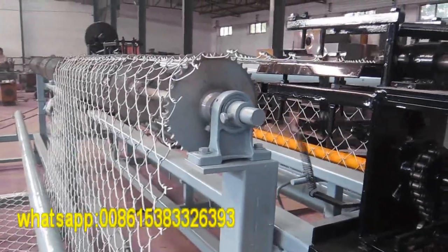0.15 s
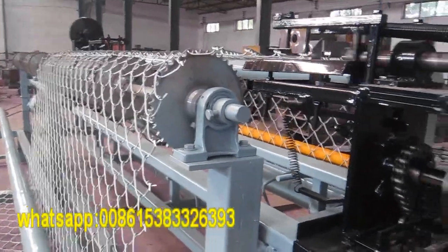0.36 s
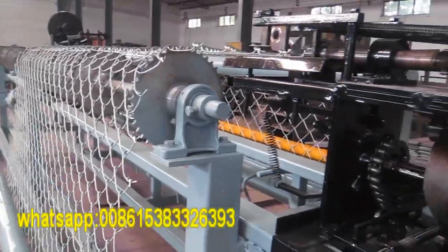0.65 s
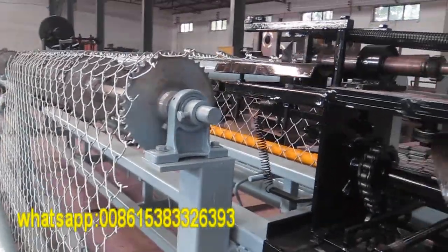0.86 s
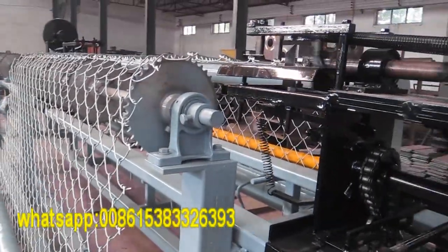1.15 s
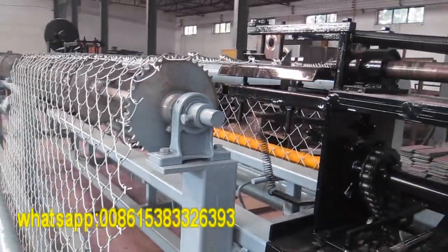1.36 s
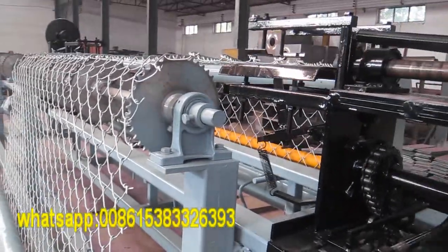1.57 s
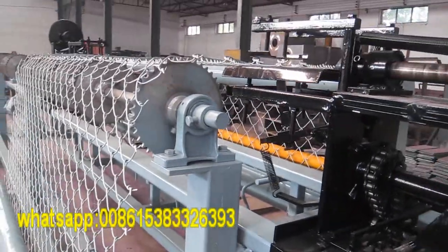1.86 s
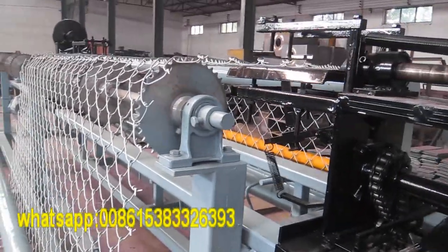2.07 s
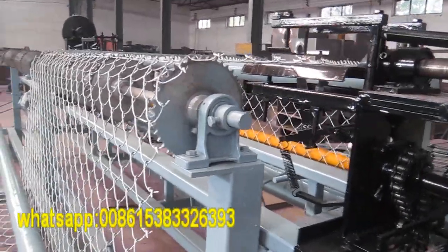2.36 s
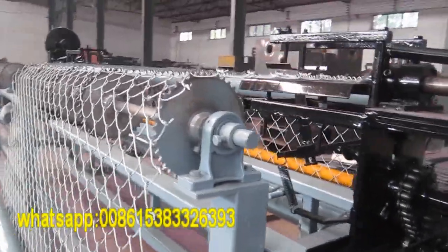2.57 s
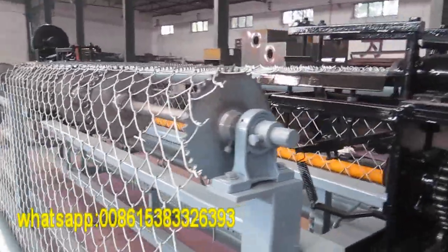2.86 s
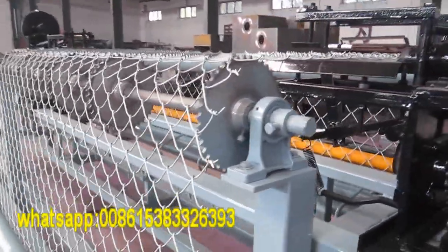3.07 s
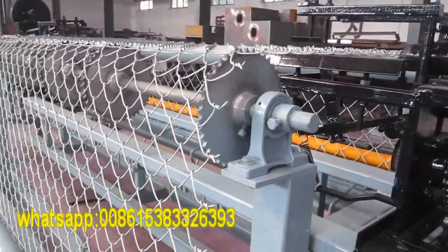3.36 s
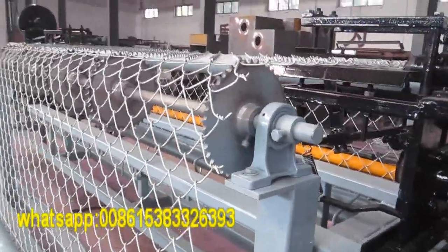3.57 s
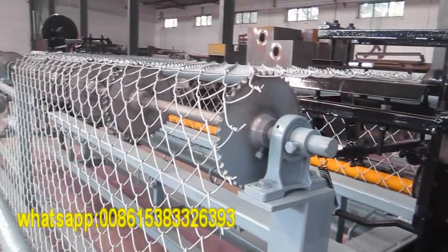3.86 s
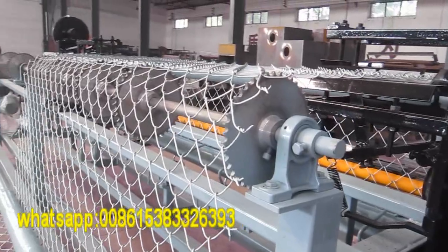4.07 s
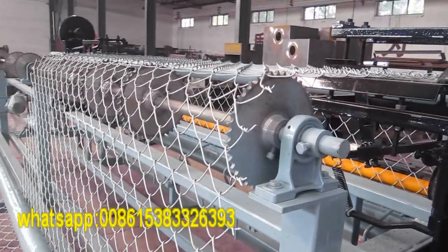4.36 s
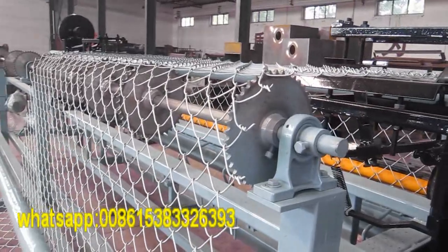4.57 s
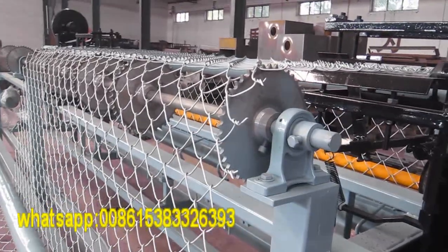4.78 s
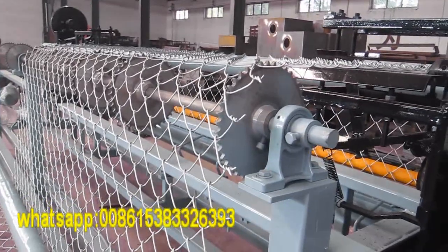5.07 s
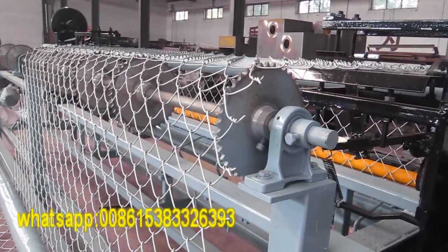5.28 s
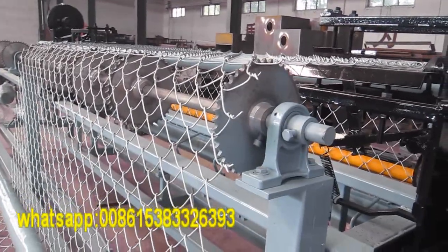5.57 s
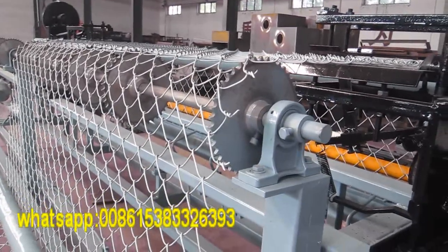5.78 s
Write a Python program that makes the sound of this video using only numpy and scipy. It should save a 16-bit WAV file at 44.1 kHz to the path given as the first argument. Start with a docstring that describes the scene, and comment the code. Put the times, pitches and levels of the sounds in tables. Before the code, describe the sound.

A wire mesh machine hums steadily in a factory hall, its cutter cracking early before fast metallic slaps and jingling wire take over.

```python
"""Chain-link fence machine in a factory hall

Two microphones hear the winding blade slap the wire spiral twice a turn over rustling, jingling mesh:
clicks set short metallic rings going. The cutter's crack is decaying noise that rings in its jaws; its
hardest blow ducks the gain, which creeps back while the next spiral starts. Dull noise bursts are the
linkage, clicks shaking the frame are the drive's rumble, and slowly swelling sines are the motor's hum.
The metal sounds echo in the hall."""
import sys
import numpy as np
from scipy import signal
from scipy.fft import rfft, irfft
from scipy.io import wavfile
from scipy.ndimage import uniform_filter1d

SR = 44100
rng = np.random.default_rng(int(sys.argv[2]) if len(sys.argv) > 2 else 0)


def digitize_waveform(pressure):
    """Quantize a signal to 16-bit integers and store it at the path in sys.argv[1].

    Rows of a 2-D input are taken as channels; values are limited to [-1, 1].
    """
    field = np.atleast_2d(pressure).T
    bounded = np.clip(field, -1, 1)
    quanta = np.round(bounded * 32767).astype(np.int16)
    wavfile.write(sys.argv[1], SR, quanta)


N = 261513
T = np.arange(N) / SR
TURN_S = 0.3  # one turn of the blade


def amp(db):
    """Decibels to gain."""
    return 10 ** (np.asarray(db) / 20)


def unit(x):
    """Scales to rms 1."""
    return x / np.sqrt(np.mean(x ** 2) + 1e-20)


def read(points, hz):
    """Reads a table on a log-frequency axis."""
    f, value = np.transpose(points)
    return np.interp(np.log(hz + 1), np.log(f + 1), value)


def follow(rows):
    """Gain over time from rows of (time_s, level_db)."""
    return amp(np.interp(T, *np.transpose(rows)))


def add(mix, start_s, sound):
    """Mixes a sound in at its start time, cutting what runs past the end."""
    part = mix[..., max(round(start_s * SR), 0):][..., :sound.shape[-1]]
    part += sound[..., :part.shape[-1]]


def convolve(x, response):
    """Convolves along time and keeps the scene's length."""
    return signal.oaconvolve(np.atleast_2d(x), np.atleast_2d(response), axes=1)[:, :N]


def colour(x, points, size=4096):
    """Causal (minimum-phase) filter with the given spectrum; white noise keeps its power."""
    log_gain = np.log(amp(read(points, abs(np.fft.fftfreq(size, 1 / SR)))))
    spectrum = np.exp(np.conj(signal.hilbert(log_gain)))
    response = np.fft.ifft(spectrum).real[:size // 2]
    return convolve(x, response / np.linalg.norm(response))


def resonate(x, hz, width_hz):
    """One resonance of gain 1 at its peak."""
    return signal.lfilter(*signal.iirpeak(hz, hz / width_hz, SR), x)


def swell(count, place, swing_db):
    """Gain that rises and falls `count` times in each turn of the blade."""
    return amp(swing_db * np.cos(2 * np.pi * count * (T / TURN_S - place)))


def clicks(per_s, spread_db):
    """Random clicks of uneven size, rms 1."""
    size = amp(spread_db * np.minimum(rng.exponential(1, N), 4))
    sign = rng.choice([-1, 1], N)
    return unit(size * sign * (rng.random(N) < per_s / SR))


# The two slaps of a turn, levels relative to the spiral's.
# Columns: level_db [dB], decay_s [s to fall 60 dB]
TURN_SLAPS = [(2.5, 0.11), (-1, 0.24)]
# The growing spiral drags, so the blade slaps it later and harder.
# Columns: time_s [s], first_delay_s [s into the turn], second_delay_s [s into the turn], level_db [dB]
SPIRAL_GROWTH = [(1.499, -0.022, 0.12, -14.5), (2.4, -0.018, .139, -12.5), (3.6, -0.0036, 0.15, -10),
                 (4.8, .003, .166, -10), (5.6, .005, .15, -9)]
FIRST_TURN = 5  # the next spiral starts to wind at this turn of the blade
# no two slaps are quite alike, and the wire bounces back once after each
SLAP_JITTER_S, SLAP_SPREAD_DB = 0.0024, 1.5
BOUNCE_S, BOUNCE_DB, BOUNCE_DECAY_S = 0.018, 1, 0.062


def slaps():
    """Times the blade's contacts: rows of (start_s, level_db, decay_s), two slaps a turn, each with a bounce."""
    rows = []
    when, *delays, level = np.transpose(SPIRAL_GROWTH)
    for turn_s in np.arange(FIRST_TURN * TURN_S, N / SR, TURN_S):
        for delay, (slap_db, decay_s) in zip(delays, TURN_SLAPS):
            shift, hard, gap, rebound = rng.uniform(-1, 1, 4)
            start_s = turn_s + np.interp(turn_s, when, delay) + SLAP_JITTER_S * shift
            db = np.interp(turn_s, when, level) + slap_db + SLAP_SPREAD_DB * hard
            bounce_at_s = start_s + BOUNCE_S * (1 + gap / 2)
            bounce_db = db + BOUNCE_DB + 2 * SLAP_SPREAD_DB * rebound
            rows += [(start_s, db, decay_s), (bounce_at_s, bounce_db, BOUNCE_DECAY_S)]
    return rows


# Spectrum of the jingling strands. Columns: pitch_hz [Hz], level_db [dB]
STRAND_COLOUR = [(200, -35), (700, 3.5), (1300, -3), (1900, -0.5), (2600, -3.5), (3400, -3), (6000, 3),
                 (7500, 0), (10000, -0.5), (13000, -2.5), (15500, -19)]
# Resonances of the wire, added to the strands.
# Columns: pitch_hz [Hz], width_hz [Hz], level_db [dB]
WIRE_RINGS = [(2760, 950, -1.5), (2950, 42, 3), (3585, 48, -6), (4380, 600, -3), (5930, 60, -6),
              (11370, 210, -5.5)]


def strands(hits, ring_s=0.056, tick=0.78, count=12):
    """Each click lands on one of several strands: a tick and a dense, short metallic ring."""
    t = T[:SR // 20]
    struck = rng.integers(0, count, N)
    out = np.zeros((2, N))
    for strand in range(count):
        ring = rng.standard_normal((2, len(t))) * amp(-60 * t / ring_s)
        # every strand favours a pitch of its own
        ring += 2 * resonate(ring, 2200 * 6 ** rng.random(), 610)
        ring /= np.linalg.norm(ring[0])
        ring[:, 0] += tick * np.array([1, 0.4])
        out += convolve(hits * (struck == strand), ring)
    out = colour(out, STRAND_COLOUR)
    return out + sum(amp(db) * resonate(out, hz, width_hz) for hz, width_hz, db in WIRE_RINGS)


# The wire catches on the mesh, mostly as the finished spiral is drawn in; levels are relative.
# Columns: start_s [s], level_db [dB], decay_s [s to fall 60 dB]
MESH_SNAGS = [(0.234, -18.5, 0.36), (0.42, -16, 0.29), (0.53, -15.5, 0.65), (0.606, -2.5, 0.03),
              (.661, -15, 0.056), (0.716, -14.5, .1), (1.022, -13, .2), (1.068, -3.5, 0.037),
              (3.4555, -5, 0.059), (5.874, -5, 0.067)]


def wire(shower_db=-11.5, first_db=7, rustle_db=-38, rise_s=0.0012):
    """A slap is one sharp contact and a dying shower of smaller ones, over the steady rustle of the mesh."""
    power, contacts = np.zeros(N), np.zeros(N)
    t = T[:SR // 3]  # each shower is cut off after a third of a second
    for start_s, db, decay_s in MESH_SNAGS + slaps():
        fade = amp(db + shower_db - 60 * t / max(decay_s, 0.02)) ** 2
        add(power, start_s, fade * (1 - np.exp(-t / rise_s)))
        add(contacts, start_s, amp([db + first_db]))
    shower = np.sqrt(power) * clicks(per_s=800, spread_db=1.0)
    rustle = amp(rustle_db) * clicks(per_s=1000, spread_db=5.0)
    rustle = rustle * swell(count=2, place=0.033, swing_db=-1.5)
    # light contacts are duller than hard slaps
    rustle = colour(rustle, [(2500, -3), (6000, -2), (13000, -9.5)])
    return microphones(strands(contacts + shower + rustle))


# Blows of the cutter and its linkage, levels relative. Columns: start_s [s], level_db [dB]
CUTTER_BLOWS = [(.008, -14), (0.0547, -1.5), (.607, -18), (0.616, -15), (1.133, -15.5), (1.161, 3),
                (1.2005, -4.5), (1.2935, -9), (1.507, -14.5)]
# Spectrum of the crack and rattle. Columns: pitch_hz [Hz], level_db [dB]
CRACK_COLOUR = [(100, -40), (500, -33), (1400, -1.5), (2000, 8), (2800, -1), (3400, 1.5), (5000, -0.5),
                (6500, -2.5), (10000, -13), (15500, -25)]
# Ring of the cutter's jaws. Columns: pitch_hz [Hz], width_hz [Hz], level_db [dB]
JAW_RINGS = [(2200, 200, -16.5), (2850, 390, -0.5), (3700, 250, -4)]


def cutter(crack_s=0.034, rattle_s=0.33, rattle_db=-18):
    """Steel jaws meet: a crack and a rattle dying in the frame, both ringing briefly in the jaws."""
    out = np.zeros((2, N))
    t = T[:SR // 3]
    fade = amp(-60 * t / crack_s) + amp(rattle_db - 60 * t / rattle_s)
    for start_s, db in CUTTER_BLOWS:
        add(out, start_s, amp(db) * rng.standard_normal((2, len(t))) * fade)
    out = colour(out, CRACK_COLOUR)
    ring = sum(amp(db) * resonate(out, hz, width_hz) for hz, width_hz, db in JAW_RINGS)
    return microphones(out + ring)


# How hard the drive works, most as it finishes a spiral; it also scales the linkage.
# Columns: time_s [s], level_db [dB]
DRIVE_LOAD = [(0, -19), (.5, -18.5), (.9, -22.5), (1.1, -20.5), (1.25, -23), (3.2, -22), (4.6, -24),
              (5.93, -22.5)]
# Dull clunks of the linkage, the same in every turn, at the usual load.
# Columns: place [0-1 of a turn], level_db [dB]
TURN_CLUNKS = [(.04, -24), (0.608, -21.5)]
# Harder clunks of the linkage in single turns, at the usual load.
# Columns: start_s [s], level_db [dB]
HARD_CLUNKS = [(1.075, -17), (1.374, -18), (1.508, -18)]
# Spectrum of all the clunks. Columns: pitch_hz [Hz], level_db [dB]
CLUNK_COLOUR = [(150, -22), (450, -2), (750, 0.5), (1150, 9.5), (1600, -3.5), (2900, -3), (5000, -10),
                (12000, -53)]


def linkage(decay_s=0.12, rise_s=0.003, usual_load_db=-24):
    """Loose joints take up slack on every turn, harder under load: a soft front and a short, dull shudder."""
    power = np.zeros(N)
    t = T[:SR // 4]
    turns = np.arange(0, N / SR, TURN_S)
    each_turn = [(turn_s + place * TURN_S, db) for turn_s in turns for place, db in TURN_CLUNKS]
    for start_s, db in each_turn + HARD_CLUNKS:
        add(power, start_s, amp(db - 60 * t / decay_s) ** 2 * (1 - np.exp(-t / rise_s)))
    shudder = np.sqrt(power) * follow(DRIVE_LOAD) / amp(usual_load_db)
    return microphones(colour(shudder * rng.standard_normal((2, N)), CLUNK_COLOUR))


def knocks(repeat=0.71):
    """Teeth and chain links knock much the same way on every turn; `repeat` is that share of the power."""
    turn = unit(clicks(per_s=2500, spread_db=3.0)[:round(TURN_S * SR)])
    repeated = np.sqrt(repeat) * np.resize(turn, N)
    return repeated + np.sqrt(1 - repeat) * clicks(per_s=1200, spread_db=1.5)


# Spectrum of the drive's body. Columns: pitch_hz [Hz], level_db [dB]
RUMBLE_COLOUR = [(20, -17), (50, -8.5), (120, -4.5), (160, -2.5), (235, 5.5), (290, 2.5), (450, -0.5),
                 (560, -6), (700, 3.5), (1100, -5.5), (1500, -6.5), (2500, -10.5), (4000, -15), (9000, -33)]
# Resonances of the frame, levels at the usual load. Columns: pitch_hz [Hz], width_hz [Hz],
# level_db [dB], swells [per turn], place [0-1 of a turn], swing_db [dB]
FRAME_RINGS = [(120.7, 19, -55, 1, 0.39, -2.5), (210.3, 26.4, -42, 2, 0.4, 6.5),
               (358, 84, -34.5, 1, 0.7, 3), (414.3, 15.7, -33.5, 1, 0.6, 4),
               (467.7, 57, -28.5, 3, 0.06, 4.5), (579, 70, -35, 3, 0.1, 5), (788, 68, -38.5, 3, 0.06, 1.5),
               (955.4, 92, -35.5, 3, .01, 3.5)]


def drive(body_db=-28, usual_load_db=-25):
    """The knocks shake the frame, whose resonances swell as the blade goes round."""
    pair = np.array([knocks(), knocks()])
    body = colour(pair, RUMBLE_COLOUR) * swell(count=3, place=0.0051, swing_db=0.5)
    out = amp(body_db) * unit(body)
    for hz, width_hz, db, count, place, swing_db in FRAME_RINGS:
        # two wider passes in a row come out at about the listed width
        ring = resonate(resonate(pair, hz, 1.65 * width_hz), hz, 1.65 * width_hz)
        out += amp(db) * unit(ring * swell(count, place, swing_db))
    return microphones(out) * follow(DRIVE_LOAD) / amp(usual_load_db)


MAINS_HZ = 50
# Magnetic hum, levels before the swells. Columns: multiple [of the mains], level_db [dB],
# place [0-1 of a turn], swing_db [dB], throb_db [dB]
HUM_LINES = [(4, -26.5, 0.93, 2, 0.8), (8, -20, 0.41, 1, 2.5), (12, -34, 0.85, 3.5, -4),
             (16, -44, 0.35, 7.5, -8)]
# The hum is loudest at the start, weaker from 1.3 s, then partly recovers, as when the
# microphones move through standing waves. Columns: time_s [s], level_db [dB]
HUM_COURSE = [(0, -1), (1.3, -5.5), (2.7, -3), (4, -2.5), (5.93, -3.5)]


def motor(throb_place=0.077):
    """Clean hum lines that swell once a turn and throb four times as fast."""
    lines = np.zeros(N)
    for multiple, db, place, swing_db, throb_db in HUM_LINES:
        level = amp(db) * swell(1, place, swing_db) * swell(4, throb_place, throb_db)
        lines += level * np.sin(2 * np.pi * (multiple * MAINS_HZ * T + rng.random()))
    return np.sqrt(2) * lines * follow(HUM_COURSE)


# How long the hall rings. Columns: pitch_hz [Hz], decay_s [s to fall 60 dB]
HALL_DECAY = [(200, 0.63), (2000, 0.76), (6000, 0.47), (14000, 0.46)]


def hall(x, size=256):
    """A diffuse tail of noise, 12 ms behind the source, whose treble dies first."""
    noise = rng.standard_normal((2, SR)) * (T[:SR] > 0.012)
    hz, t, bands = signal.stft(noise, SR, nperseg=size)
    fade = amp(-60 * t / read(HALL_DECAY, hz)[:, None])
    tail = signal.istft(bands * fade, SR, nperseg=size)[1]
    return convolve(x, tail / np.linalg.norm(tail[0]))


# Likeness of the two microphones. Columns: pitch_hz [Hz], coherence [0-1]
MICROPHONE_LIKENESS = [(25, 0.98), (100, 0.99), (400, 0.98), (700, 1), (1400, 0.94), (3000, 0.49),
                       (6000, 0.12), (15000, 0.033)]
# Lean towards the left microphone. Columns: pitch_hz [Hz], level_db [dB, left over right]
LEFT_LEAN = [(700, 0), (1300, 1.5), (2400, -3), (4000, -1)]


def microphones(pair):
    """Two unrelated channels become alike in the bass; sound reaches the left one slightly later."""
    a, b = rfft(pair)
    hz = np.fft.rfftfreq(N, 1 / SR)
    same = np.clip(read(MICROPHONE_LIKENESS, hz), 0, 1)
    lean = amp(read(LEFT_LEAN, hz) / 2)
    shared, apart = np.sqrt((1 + same) / 2) * a, np.sqrt((1 - same) / 2) * b
    left, right = irfft([(shared + apart) * lean, (shared - apart) / lean], N)
    return np.array([np.roll(left, 2), right])  # 2 samples late


def scene(hall_db=-11):
    """Hum and rumble, with the metal sounds echoing in the hall."""
    metal = wire() + cutter() + linkage()
    return motor() + drive() + metal + amp(hall_db) * hall(metal)


def record(dry, limit_db=-9, recover_db_per_s=12, notch_hz=8230, notch_width_hz=2100, edge_hz=15800):
    """The microphone's treble notch, a gain control that ducks at once and recovers slowly, and the band limit."""
    x = signal.lfilter(*signal.iirnotch(notch_hz, notch_hz / notch_width_hz, SR), dry)
    power_db = 10 * np.log10(abs(uniform_filter1d((x ** 2).mean(0), size=160)) + 1e-12)
    # the highest level so far, sinking steadily
    fall_db = T * recover_db_per_s
    held_db = np.maximum.accumulate(power_db + fall_db) - fall_db
    over_db = np.maximum(held_db - limit_db, 0)
    x = np.clip(x / amp(uniform_filter1d(over_db, size=40)), -1, 1)
    low_pass = signal.firwin(401, edge_hz, window=("kaiser", 8), fs=SR)
    return signal.oaconvolve(x, low_pass[None], "same")


dry = scene()
out = record(dry)
digitize_waveform(out)
```